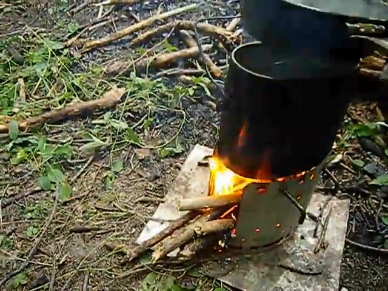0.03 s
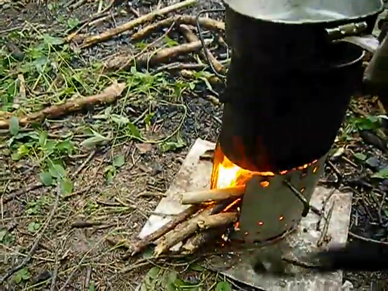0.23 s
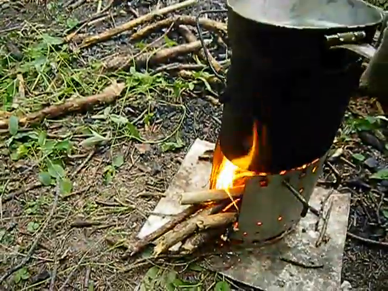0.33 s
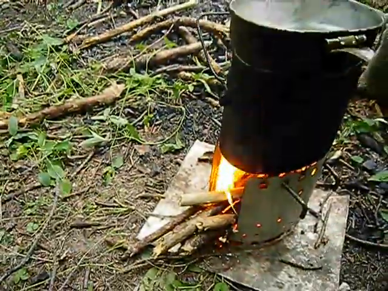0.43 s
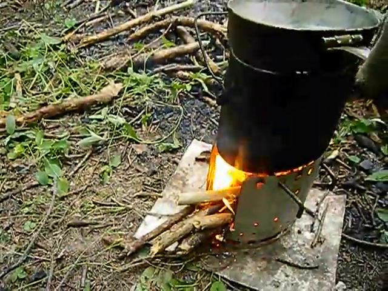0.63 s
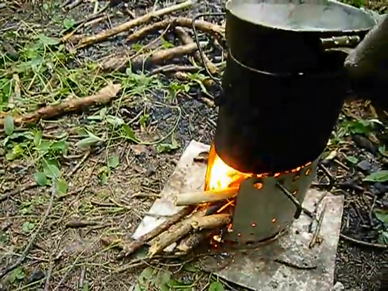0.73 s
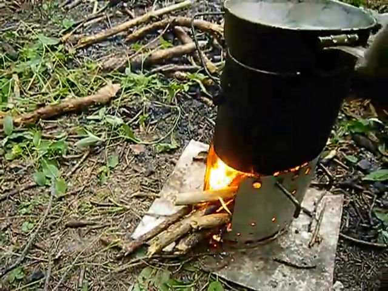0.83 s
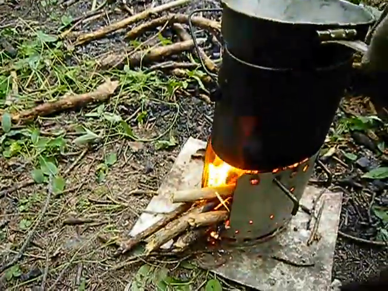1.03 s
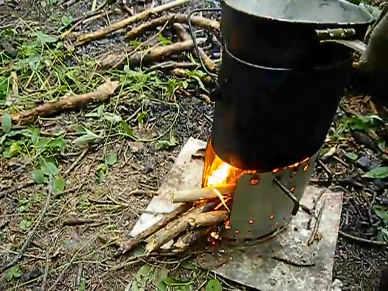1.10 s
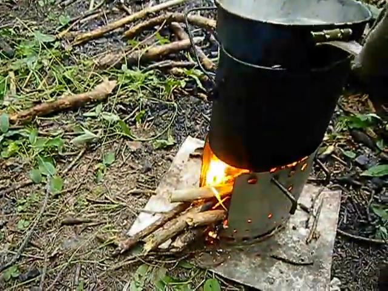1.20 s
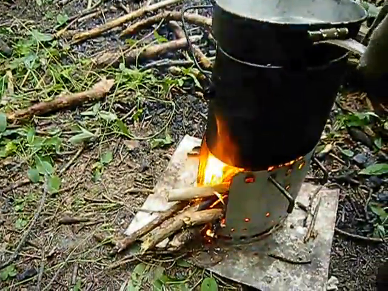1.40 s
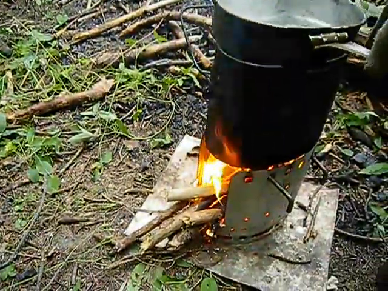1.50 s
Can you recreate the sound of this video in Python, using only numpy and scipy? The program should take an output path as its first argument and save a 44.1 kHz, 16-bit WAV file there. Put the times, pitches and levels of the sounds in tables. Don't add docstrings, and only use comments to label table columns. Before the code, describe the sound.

Close outdoors, soft fire noise comes first, then a hard pan-on-pot clank with quick bounces, faint taps and wood ticks, a second group of knocks and fine rattling; muffled treble, first blow overloaded.

```python
import sys
import numpy as np
from scipy import signal
from scipy.io import wavfile
from scipy.ndimage import uniform_filter1d

SR = 44100
rng = np.random.default_rng(int(sys.argv[2]) if len(sys.argv) > 2 else 0)


def volts_from_db(level):
    exponent = np.asarray(level, float) / 20
    return 10 ** exponent


def generate_wav(signal):
    frames = np.transpose(np.atleast_2d(signal))
    scaled = np.clip(frames, -1, 1) * 32767
    pcm = np.round(scaled).astype(np.int16)
    wavfile.write(sys.argv[1], SR, pcm)


N = 68355

# start [s], thud level [dB], thud pitch [Hz], crack
# level [dB], wall ring relative to thud [dB].
POT_BLOWS = [(.238, -6, 940.4, -17, -9), (0.238, -6, 2264, -43.5, -55.5), (.238, -22.5, 478, -61, -39.5),
             (.2445, -26, 845, -70, 11), (.257, -16.5, 1056, -30, -2.5), (.26, -27.5, 874, -69.5, 5.5),
             (.2855, -9, 1186, -29.5, -30), (.2855, -14, 1893, -38, -64), (.2872, -9, 867, -60, -10),
             (.2865, -25.5, 590, -67.5, -40), (.311, -16.5, 923, -69.5, -8.5),
             (.3445, -11.5, 855, -43, -12.5), (.3445, -29, 1767, -38, -65), (1.0395, -55, 854, -70, 5),
             (1.0425, -16.5, 857, -49, -16), (1.047, -22.5, 870, -47, -7.5), (1.1537, -8.5, 865, -32, -14),
             (1.1953, -8.5, 857, -28, -21.5), (1.2002, -9.5, 751, -70, -10.5),
             (1.205, -20.5, 680, -61, -3.5), (1.212, -18.5, 890, -69, -9.5), (1.2525, -25, 813, -42.5, 4),
             (1.267, -15.5, 840, -47, -21),
             (1.2436, -6.5, 860, -22, -15),
    (1.243, -10.5, 2150, -50, -60),
]
# start [s], level [dB], pitch [Hz].
RATTLE_TAPS = [(0.407, -35.5, 900), (0.45, -42, 760), (0.504, -36, 806), (0.527, -38.5, 775),
               (0.55, -28, 782), (0.908, -36, 820), (0.919, -37, 820), (0.934, -32.5, 814),
               (1.006, -39, 910), (1.057, -32.5, 770), (1.079, -47, 824), (1.337, -40, 740),
               (1.363, -35, 704), (1.377, -34, 800), (1.39, -35.5, 770), (1.417, -38, 754),
               (1.431, -34, 780), (1.443, -31.5, 735), (1.45, -34.5, 780), (1.456, -32.5, 886),
               (1.466, -30.5, 745), (1.477, -45, 690), (1.484, -41, 960), (1.497, -42, 790)]
# frequency [Hz], 60 dB decay time [s].
POT_WALL_MODES = [(727, 0.023), (759, 0.18), (797, 0.19), (848, .12), (926, 0.13), (1071, 0.093),
                  (1180, .05)]
# frequency [Hz], level [dB], 60 dB decay time [s].
CRACK_MODES = [(1317, 6.5, 0.014), (1700, -2.5, 0.043), (1886, 8, 0.017), (2222, 5.5, 0.013),
               (2442, -5, .04), (2684, -4.5, 0.037), (2965, -7, 0.086), (3161.5, -3.5, .03),
               (3745, -7, 0.021), (4012, -14.5, 0.043), (4299, -10, 0.013), (4970, -41.5, 0.026)]
# frequency [Hz], 60 dB decay time when free [s], the same when seated [s],
# offset of the twin mode [Hz], twin level [dB].
PAN_MODES = [(1442, 9, 0.23, -7, -10.5), (2146.4, 5.6, 0.13, -3, -39), (2861, 0.17, 0.28, 2.5, -26.5),
             (3179.5, 0.49, 0.25, 7.5, -15.5), (4813, 0.59, .3, 6, -12.5)]
# start [s], then levels of the four lowest pan modes [dB].
PAN_STRIKES = [
    (.239, -29, -21.5, -26, -26.5),
    (1.154, -29.5, -52, -50.5, -57.5),
    (1.198, -55.5, -53, -39, -48),
    (1.246, -32, -30, -37.5, -29),
]
# start [s], level [dB], pitch [Hz].
WOOD_TICKS = [(0.051, -36.5, 240), (0.127, -37, 195), (0.941, -53, 145), (1.071, -44, 3300),
              (1.04, -29, 1700), (.394, -31, 2990), (0.599, -36, 3160), (.63, -37.5, 1800),
              (0.664, -33.5, 380), (.692, -53, 4000), (0.732, -27.5, 2810), (.823, -35.5, 3370),
              (0.923, -33, 3330), (1.143, -38, 2995), (1.398, -58, 3300), (1.489, -41.5, 354)]
# frequency [Hz], level [dB].
ROAR_SPECTRUM = [(25, -12.5), (100, -20), (135, -4), (280, 0.5), (500, -4.5), (1800, -9), (3700, -14.5),
                 (4400, -27), (5200, -55)]
# time [s], level [dB].
FIRE_SWELL = [(0, -1.5), (.5, -1.5), (.8, 0.5), (1.1, -1.5), (1.45, 1), (1.55, -2)]


def read(points, x):
    f, value = np.transpose(points)
    return np.interp(np.log(x + 1), np.log(f + 1), value)


def evened(x):
    return x / np.sqrt(np.mean(x ** 2) + 1e-20)


def add(mix, start_s, sound):
    part = mix[round(start_s * SR):][:len(sound)]
    part += sound[:len(part)]


def mode(t, hz, t60, phase=0, rise=0.00061):
    return (1 - np.exp(-t / rise)) * volts_from_db(-60 * t / t60) * np.sin(2 * np.pi * (hz * t + phase))


def knock(hz, ring_db, swell_s, phases):
    spread_hz, wall_lag_s = 70.6, 0.00078
    t = np.arange(9000) / SR
    near = np.array([np.exp(-.5 * ((f - hz) / spread_hz) ** 2) for f, _ in POT_WALL_MODES])
    shares = near / np.linalg.norm(near)
    ring = 0
    for share, (f, t60), phase in zip(shares, POT_WALL_MODES, phases):
        ring = ring + share * mode(t, f, t60, phase, wall_lag_s)
    u = t / swell_s / 2 * (hz / 900) ** 0.5
    thud = (u * np.exp(1 - u)) ** 2 * np.sin(2 * np.pi * hz * t)
    return thud + volts_from_db(ring_db) * ring


def crack(phases, losses):
    t = np.arange(4000) / SR
    out = np.zeros(len(t))
    for (hz, db, t60), phase, loss in zip(CRACK_MODES, phases, losses):
        out += volts_from_db(db - 3.8 * loss + 13) * mode(t, hz, t60, phase, 0.00071)
    return out


def pot():
    out = np.zeros(N)
    blows = POT_BLOWS
    for (s, db, hz, crack_db, ring_db), draw in zip(blows, rng.random((len(blows), 31))):
        add(out, s, volts_from_db(db) * knock(hz, ring_db, 0.00091, draw))
        add(out, s, volts_from_db(crack_db - 10.5) * crack(draw[7:], draw[19:]))
    for (s, db, hz), phases in zip(RATTLE_TAPS, rng.random((len(RATTLE_TAPS), 7))):
        add(out, s, volts_from_db(db) * knock(hz, -10.5, 0.001, phases))
    return signal.sosfilt(signal.butter(2, 503, "high", fs=SR, output="sos"), out)


def pan():
    seated_s, seating_s, top_mode_db = 0.36, 0.016, -31
    out, t = np.zeros(N), np.arange(SR // 2) / SR
    for s, *levels in PAN_STRIKES:
        seated = 1 / (1 + np.exp(-np.clip((t + s - seated_s) / (seating_s / 4), -50, 50)))
        levels = levels + [levels[3] + top_mode_db]
        for (hz, free_t60, seated_t60, twin_hz, twin_db), db in zip(PAN_MODES, levels):
            decay_rate = (1 - seated) / free_t60 + seated / seated_t60
            fade = volts_from_db(db + 1.5 - 60 * np.cumsum(decay_rate) / SR)
            main = np.sin(2 * np.pi * hz * t)
            twin = volts_from_db(twin_db) * np.sin(2 * np.pi * (hz + twin_hz) * t)
            add(out, s, np.minimum(t / 0.0026, 1) * fade * (main + twin))
    return out


def wood_ticks():
    out, t = np.zeros(N), np.arange(2000) / SR
    for (s, db, hz), phases in zip(WOOD_TICKS, rng.random((len(WOOD_TICKS), 3))):
        for share, phase in zip((.75, 1, 1.25), phases):
            add(out, s, volts_from_db(db) * mode(t, hz * share, 0.0035 + 12 / hz, phase, 1.2 / hz))
    return signal.sosfiltfilt(signal.butter(4, 4000, fs=SR, output="sos"), out)


def crackle():
    t = np.arange(400) / SR
    sizes = volts_from_db(-66.5 + 5.8 * rng.exponential(1, N))
    snaps = sizes * (rng.random(N) < 60 / SR)
    return signal.oaconvolve(snaps, mode(t, 3300, .004) + mode(t, 1500, .005))[:N]


def whistle():
    centre_s, span_s = .84, .14
    t = np.arange(N) / SR
    noise = rng.standard_normal((2, N))
    waver = evened(uniform_filter1d(uniform_filter1d(noise, size=600), size=600))
    tone = np.sin(2 * np.pi * np.cumsum(1720 + 25 * waver[1]) / SR)
    swell = np.exp(-.5 * ((t - centre_s) / span_s) ** 2)
    return volts_from_db(-58) * (1 + 0.36 * waver[0]) * tone * swell


def roar():
    frames, hz = N // 128 + 6, np.fft.rfftfreq(512, 1 / SR)
    real, imaginary, patches = rng.standard_normal((frames, 257, 3)).T
    patches = uniform_filter1d(patches, size=6, axis=0)
    patches = evened(uniform_filter1d(patches, size=12, axis=1))
    flutter = evened(uniform_filter1d(rng.standard_normal(frames), size=3))
    level_db = read(ROAR_SPECTRUM, hz)[:, None] + 1.5 * patches + 0.79 * flutter
    spectra = (real + 1j * imaginary) * volts_from_db(level_db)
    noise = evened(signal.istft(spectra, nperseg=512, noverlap=384)[1][:N])
    swell_db = np.interp(np.arange(N) / SR, *np.transpose(FIRE_SWELL))
    return noise * volts_from_db(-46.5 + swell_db)


def scene():
    fire = wood_ticks() + crackle() + whistle() + roar()
    return (pot() + pan() + fire)[None]


def low_pass(x):
    return signal.sosfilt(signal.butter(12, 16800, fs=SR, output="sos"), x)


def record(dry):
    edge_hz, offset, clip = 5150, -.0027, .685
    treble_loss = signal.firwin(255, edge_hz, window=("kaiser", 8), fs=SR)
    dull = signal.oaconvolve(dry, treble_loss[None], "same")
    mix = np.clip(dull + offset, -clip, clip)
    return low_pass(mix)


dry = scene()
out = record(dry)
generate_wav(out)
```